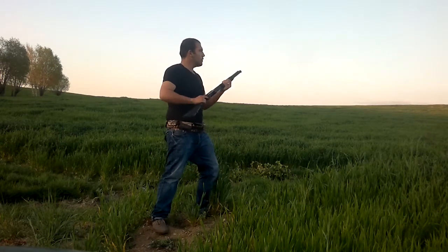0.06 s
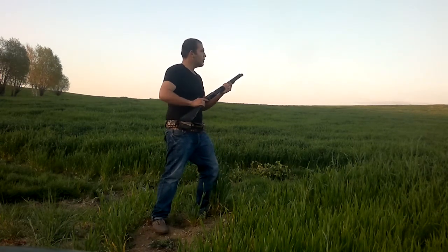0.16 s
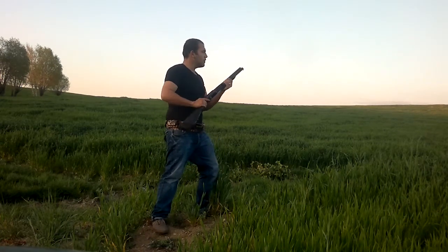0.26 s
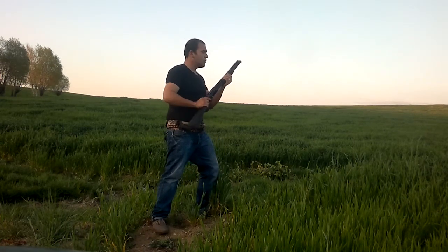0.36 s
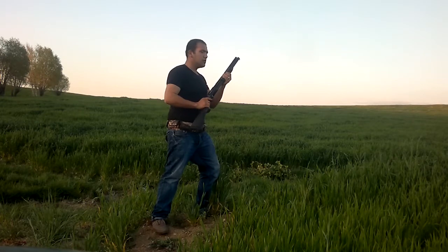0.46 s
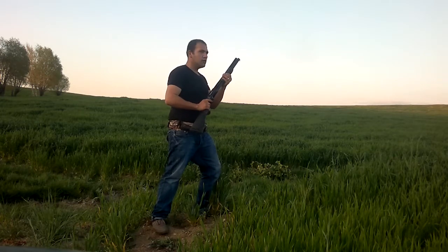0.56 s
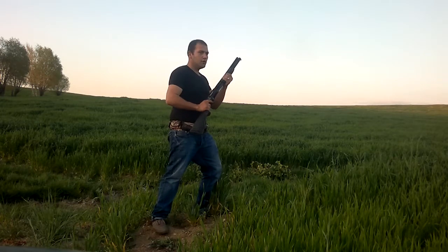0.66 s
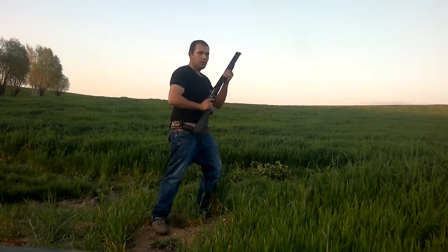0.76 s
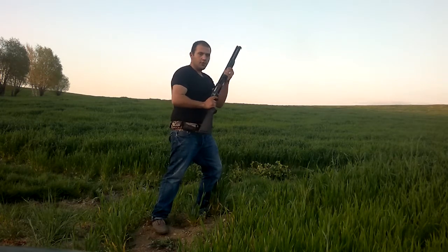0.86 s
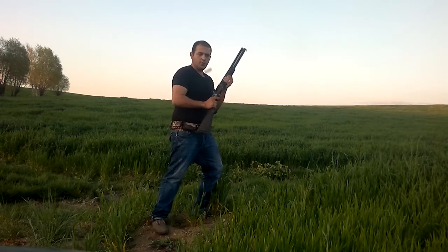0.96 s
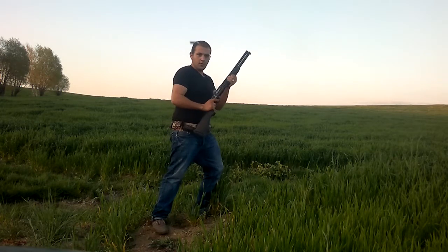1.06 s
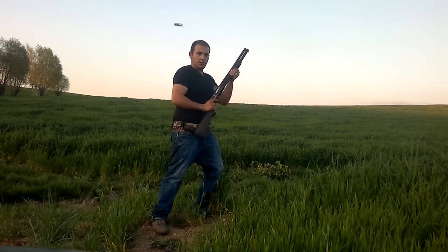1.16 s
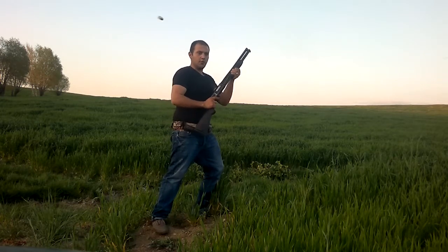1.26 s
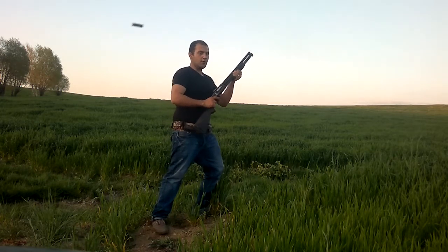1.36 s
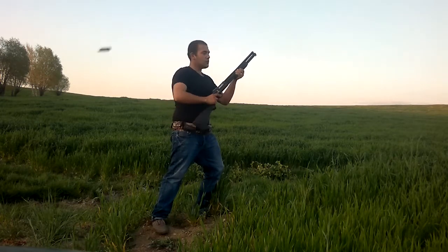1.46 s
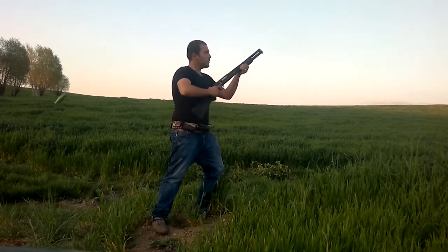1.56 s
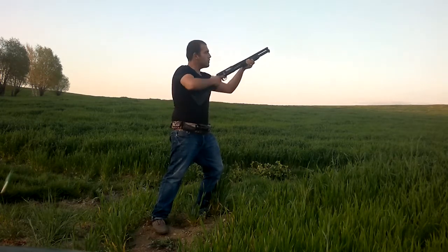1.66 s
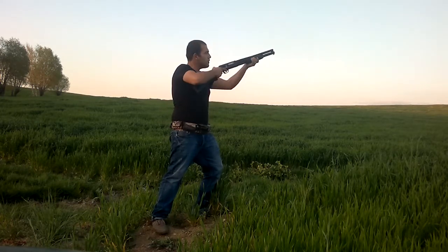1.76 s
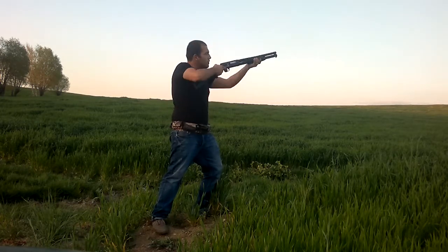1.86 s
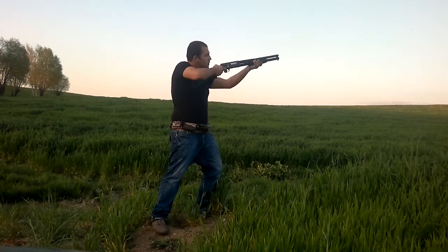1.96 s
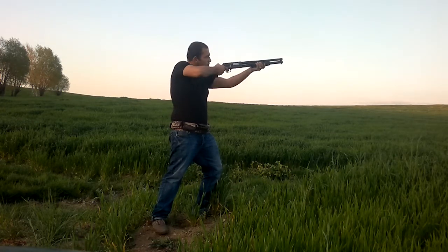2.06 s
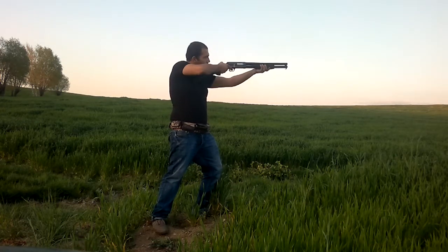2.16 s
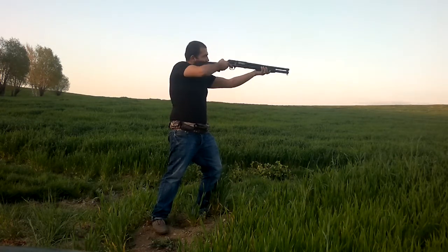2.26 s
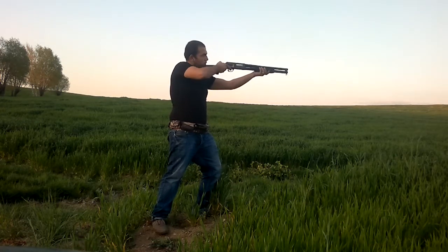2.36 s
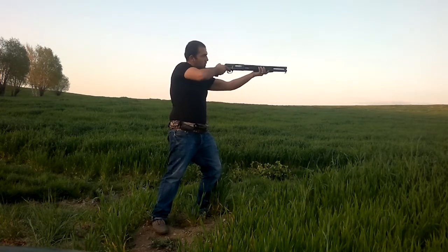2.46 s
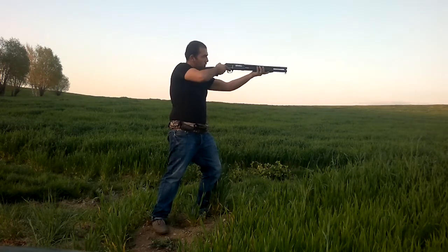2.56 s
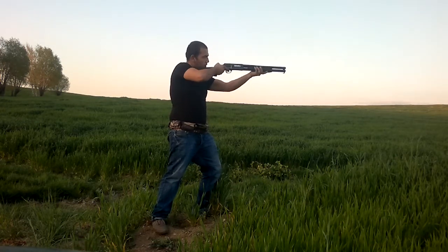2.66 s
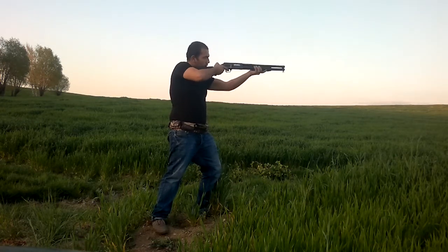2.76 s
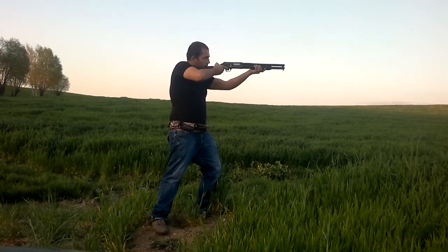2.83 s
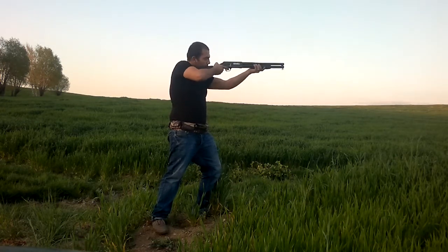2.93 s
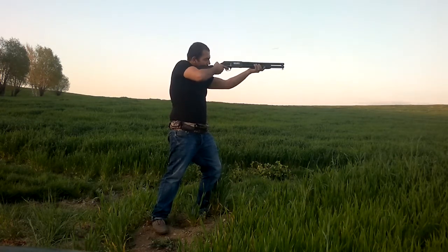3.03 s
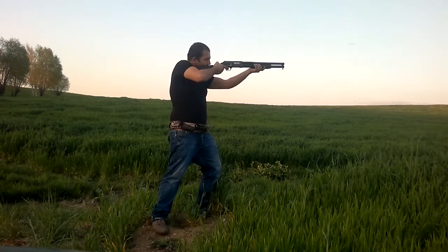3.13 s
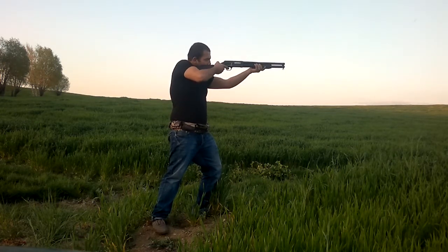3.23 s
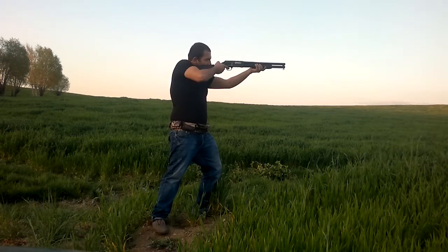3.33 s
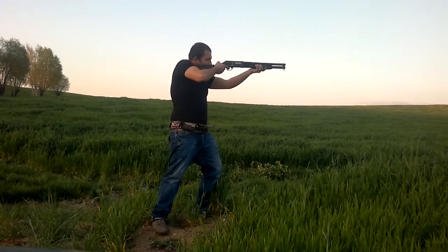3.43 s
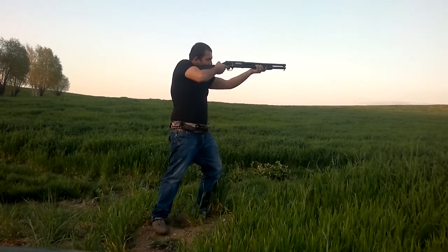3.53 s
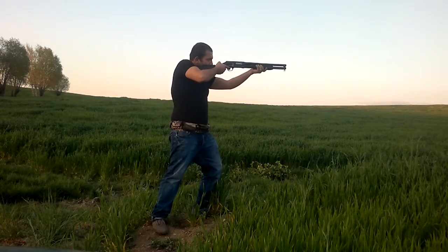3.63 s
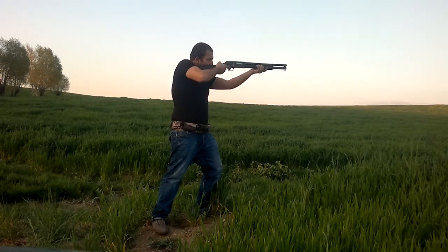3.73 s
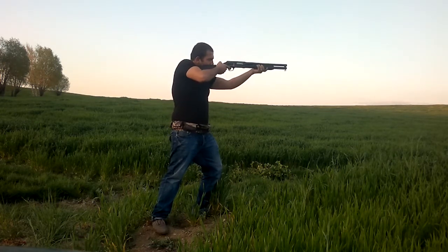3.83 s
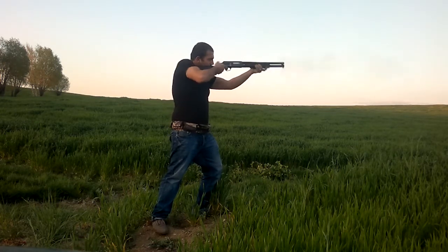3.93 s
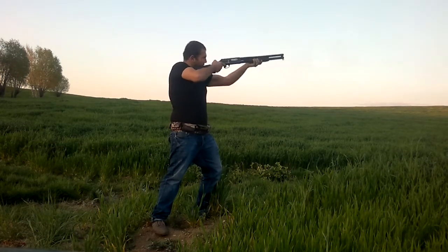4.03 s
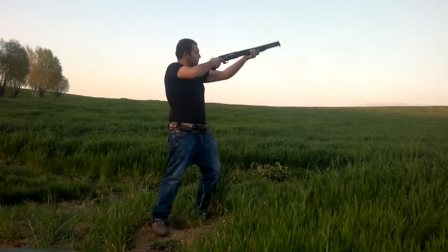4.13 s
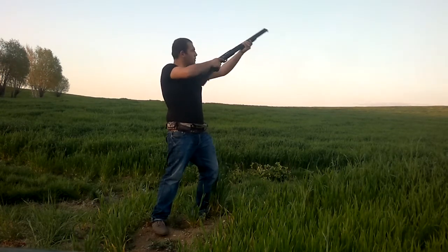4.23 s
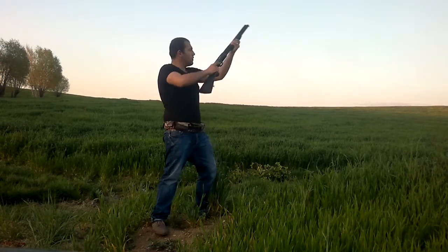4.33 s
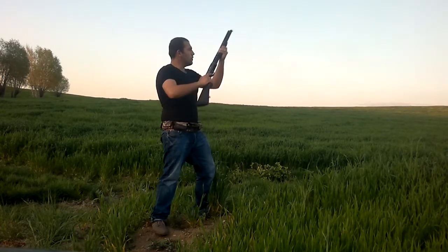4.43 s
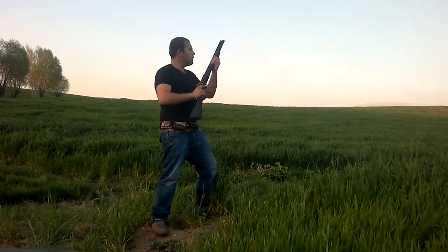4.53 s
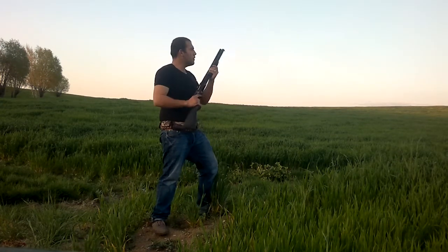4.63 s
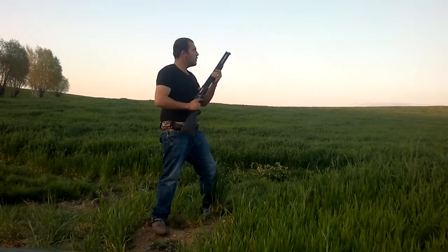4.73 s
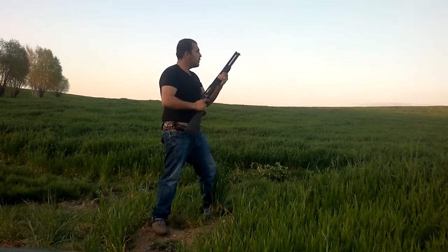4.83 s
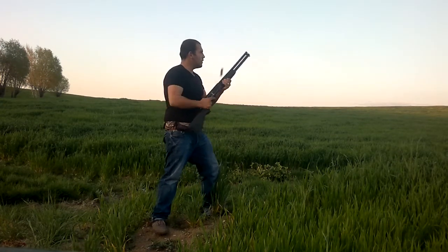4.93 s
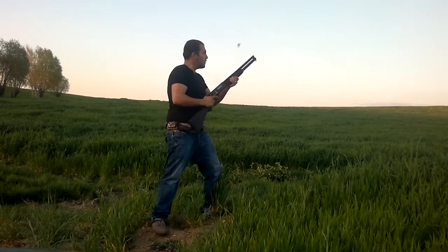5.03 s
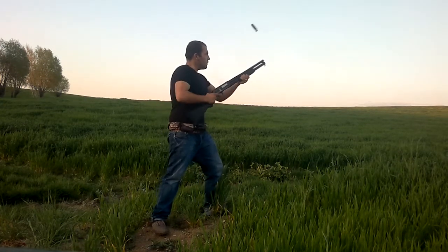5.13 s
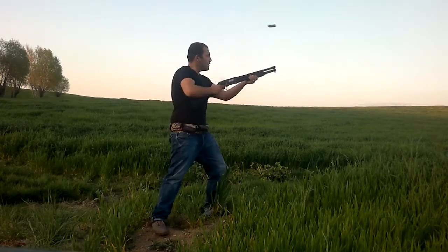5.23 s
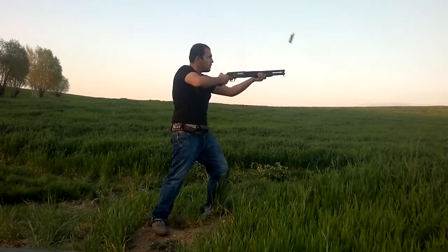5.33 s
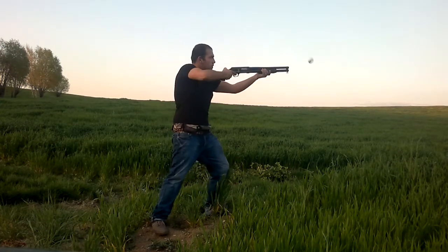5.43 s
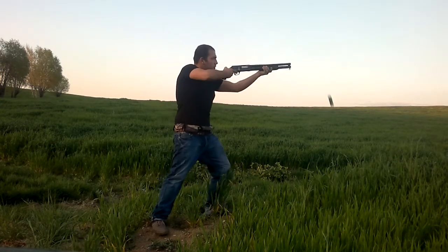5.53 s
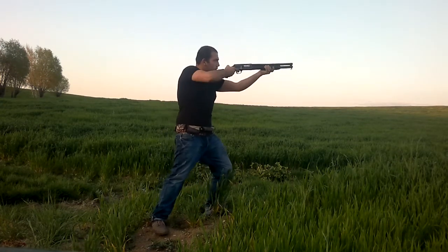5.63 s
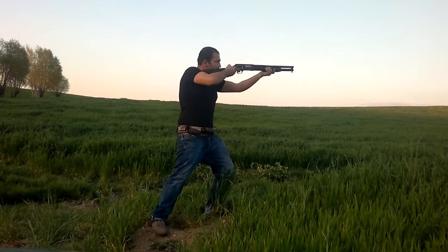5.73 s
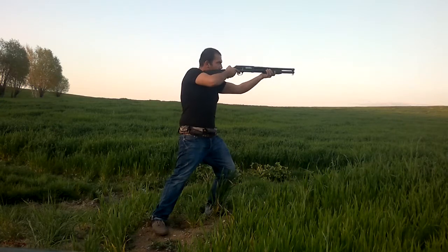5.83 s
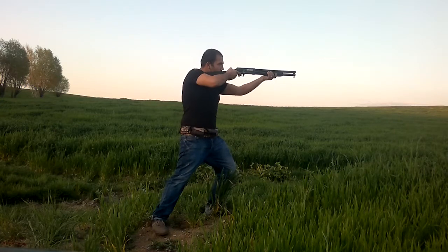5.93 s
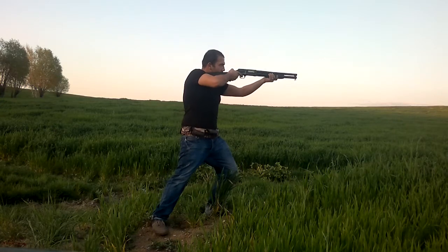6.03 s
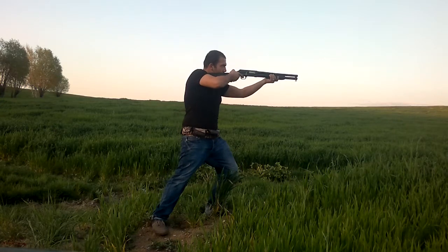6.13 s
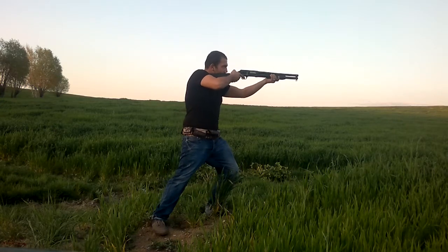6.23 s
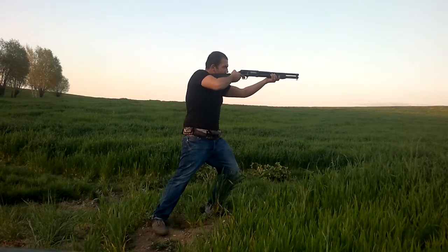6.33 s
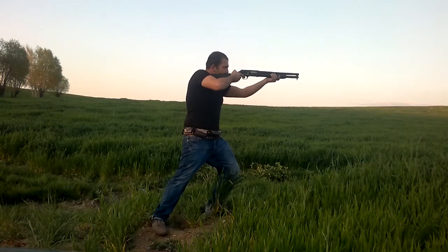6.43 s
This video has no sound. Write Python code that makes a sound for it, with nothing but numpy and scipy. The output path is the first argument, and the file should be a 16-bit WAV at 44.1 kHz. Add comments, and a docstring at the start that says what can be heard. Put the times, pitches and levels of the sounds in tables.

```python
"""A pump-action shotgun fires one shot in an open field, racked before and after, a few metres from a phone.
The blast is a slowing run of overloaded swings, a noise crack and a deep heave; filtered noise makes the
scatter from the grass, slaps from the ground, slope and trees, and the roll; a sinking rumble adds bass.
Bursts of noise through steel modes make the racking; ringing hulls land and dull handling knocks follow.
Behind it, wind rumbles over a far rush that the phone's gain turns down for a while, and an early hiss."""
import sys
import numpy as np
from scipy import signal
from scipy.fft import rfft, irfft
from scipy.io import wavfile
from scipy.ndimage import uniform_filter1d, minimum_filter1d

SR = 44100
rng = np.random.default_rng(int(sys.argv[2]) if len(sys.argv) > 2 else 0)


def unload_wav(signal):
    """Save mono or channel-first audio to the path in sys.argv[1] as 16-bit WAV at rate SR, clipped to [-1, 1]."""
    wavfile.write(
        sys.argv[1],
        SR,
        np.round(np.clip(np.atleast_2d(signal).T, -1, 1) * 32767).astype(np.int16),
    )


N = 286209  # samples

SHOT_S = 3.9318
# spectrum of the blast's noise crack: freq_hz, relative_level_db
CRACK_SPECTRUM = [(50, -6), (100, -1), (200, -3.5), (450, 0), (700, -6), (1000, -1), (1600, -2.5),
                  (2600, -1), (3300, -6.5), (4200, -13.5), (5200, -19), (8000, -19.5), (12000, -20.5),
                  (15500, -37.5)]
# swings of the blast: first rate, time constant of slowing, level, hold, then release
SWING_HZ, SWING_SLOWING_S, SWING_DB, SWING_HOLD_S, SWING_RELEASE_T60_S = 1896, .023, -2.3, .043, .02
# the overloaded microphone stalls midway: time after the shot, half length, share of the swing rate left
STALL_S, STALL_HALF_S, STALL_RATE = .0248, .0052, .24
# the last heave slows too
HEAVE_START_HZ, HEAVE_END_HZ, HEAVE_SLOWING_S = 70, 24, .009

# spectrum of the hiss scattered by the grass: freq_hz, relative_level_db
SCATTER_SPECTRUM = [(40, -10), (100, -3.5), (220, -3.5), (400, -9.5), (650, -14), (950, -3.5), (1200, -5.5),
                    (1600, -16.5), (2350, -9.5), (3300, -16.5), (5000, -25), (8000, -17), (11000, -19),
                    (13200, -28), (15500, -47.5)]
# slaps from the ground, the slope and trees: start_s, level_db, length_s (fall to 1/e)
ECHO_SLAPS = [(3.988, -25, .025), (4.173, -44, 0.018), (4.184, -30.5, 0.006), (4.214, -35.5, 0.019),
              (4.233, -34, 0.015), (4.291, -41.5, .015), (4.35, -41, 0.0088), (4.544, -33.5, 0.011)]
# spectrum of each slap: freq_hz, relative_level_db
ECHO_SPECTRUM = [(200, -21), (600, -9.5), (1000, 11.5), (1600, -1), (2500, -8), (3800, -22), (8000, -50)]

# spectrum of the roll off the trees: freq_hz, relative_level_db
ROLL_SPECTRUM = [(35, -55), (60, -21), (130, -4), (225, -18), (255, -38), (413, -16.5), (628, -2.5),
                 (758, -6), (1020, 3), (1280, -12), (1950, -12.5), (2400, -6.5), (3890, -18.5), (4900, -25),
                 (9000, -33), (11700, -62), (19800, -120)]
# the roll swells as the shot reaches the trees, fades along them and dies quickly past the last
ROLL_DELAY_S, ROLL_ATTACK_S, ROLL_HOLD_S = .25, .07, .72
ROLL_LEVEL_DB, ROLL_SPREADING, ROLL_RELEASE_T60_S = -41.8, 1.03, .95  # spreading is a power of time

# rackings of the slide: rear_stop_s, throw_s (shell out), lock_s (forward), stop_level_db,
# slide_level_db (rubbing and rattle), lock_tilt_db_per_octave (extra treble)
RACKINGS = [(.914, 0.9589, 1.1099, -3.3, -2, 1.5), (4.877, 4.915, 5.082, -9.3, -12, -.7)]
# steel contacts as the slide hits the rear stop: offset_s, relative_level_db, tilt_db_per_octave
REAR_STOP_CONTACTS = [(-.02, -22, -1), (-.0115, -21, -1), (-.0056, -8, 0), (-.0026, -4, 0.5), (0, 0, 0),
                      (.0036, -8.5, -2), (.012, -24, -4)]
# steel contacts as the shell is thrown: offset_s, relative_level_db, tilt_db_per_octave
EJECT_CONTACTS = [(0, -14.5, 2), (.007, -21.5, -0.5), (.028, -26, 7.5)]
# steel contacts as the action locks forward: offset_s, relative_level_db, tilt_db_per_octave
LOCK_CONTACTS = [(-.0125, -19, 2), (-.0095, -14.5, 2), (-.0036, -8.5, .5), (0, -5.2, .5), (.004, -18, -2)]
# the hand takes up the slack, pulls, and turns round once the shell is out
SLACK_S, PULL_S, TURN_S = .057, .026, .018  # before the stop, before the stop, after the throw
SLACK_DB, SLACK_TILT_DB, PULL_DB, PUSH_DB = -42, -8, -37.5, -45.5  # relative; tilt per octave
# the fresh shell rattles on the lifter during the forward stroke: relative level, tilt per octave, scatter
RATTLE_DB, RATTLE_TILT_DB, RATTLE_SCATTER_DB, RATTLE_TILT_SCATTER_DB = -28, 1.5, 1, 3.5
RATTLE_FROM, RATTLE_TO = .355, .615  # shares of the time from throw to lock
# broad clack of the steel: freq_hz, relative_level_db
STEEL_SPECTRUM = [(88, -55), (150, -27), (681, -11.5), (930, -5), (1540, -3.5), (1870, 0.5), (2180, -16),
                  (2980, -9), (4140, -11.5), (5230, -19.5), (6110, -13.5), (8660, -14), (9730, -16),
                  (11400, -8), (15500, -37)]
# ring of receiver and barrel: freq_hz, relative_level_db, t60_s
GUN_RING_MODES = [(958, -3, 0.029), (1210, -3.5, .03), (1396, -3.5, .03), (1722, -3, .022),
                  (1899, -1.5, 0.031), (2410, -8, 0.024), (2980, -7, .025), (3780, -11, .025),
                  (4142, -6, 0.026), (6240, -14, .02), (7020, -8.5, 0.02427), (8580, -8, .02),
                  (10500, -9, 0.02), (10950, -4, .025), (11600, -6.5, .03), (11870, -7.5, 0.0209)]

# the spent shell lands and bounces: start_s, level_db
SHELL_LANDINGS = [(1.807, -25), (1.8204, -35.5), (1.872, -50.5), (1.945, -51), (5.806, -31), (5.823, -42.5)]
# the empty hull rings as a quarter-wave pipe: freq_hz, relative_level_db, t60_s
HULL_RING_MODES = [(950, -16, .027), (1246, 3, 0.054), (1454, -3, 0.018), (2470, -15, 0.018),
                   (3670, -23, 0.039)]
# spectrum of the hull's tick on the ground: freq_hz, relative_level_db
TICK_SPECTRUM = [(150, -16), (400, -13), (1100, 3.5), (2200, -9), (4000, -24), (12000, -23.5), (15000, -38)]

# dull knocks of hands, trigger and boots: start_s, level_db, pitch_hz, t60_s
HANDLING_KNOCKS = [(.143, -34.5, 637, 0.074), (.216, -36.5, 633, 0.046), (2.126, -36, 1006, 0.02),
                   (3.327, -40, 940, 0.058), (3.846, -37.5, 943, 0.05), (3.92, -30, 980, 0.034),
                   (5.184, -44, 1107, 0.029), (5.222, -37.5, 533, 0.059), (6.255, -42.5, 925, .04),
                   (6.313, -39, 707, 0.047), (6.32, -39, 231, 0.082)]
# spectrum of the thud in each knock: freq_hz, relative_level_db
THUD_SPECTRUM = [(150, -10), (600, -0.5), (1200, 1.5), (2400, -13), (3200, -30), (8000, -45.5)]

# gusts on the microphone, over a light breeze: peak_s, level_db, half_length_s (fall to 1/e)
WIND_GUSTS = [(.65, -57.5, .25), (1.42, -43.5, .47), (2.68, -43, .6), (3.75, -60, .2), (6.42, -58, 0.18)]
BREEZE_DB = -63
# spectrum of the wind rumble: freq_hz, relative_level_db
WIND_SPECTRUM = [(12, -46), (20, -16), (73, -2), (91, 2.5), (110, -3), (150, -12), (216, -21), (307, -18.5),
                 (400, -26.5), (520, -54.5), (880, -120)]
# spectrum of the distant rush: freq_hz, relative_level_db
RUSH_SPECTRUM = [(120, -37.5), (200, -6), (304, -5), (352, -10), (462, -5), (842, -2), (1090, -2.5),
                 (1230, -4), (1650, -10.5), (2560, -16.5), (3070, -38), (3750, -34.5), (4330, -39),
                 (9660, -41), (15500, -49)]
# the phone's gain turns the rush down for a while: start_s, end_s, depth_db
RUSH_DUCKS = [(0.285, 1.33, -7), (3.95, 5.727, -8)]
RUSH_LEVEL_DB, DUCK_EDGE_S = -51.5, .13
# spectrum of the faint early hiss: freq_hz, relative_level_db
HISS_SPECTRUM = [(300, -40), (700, -10), (1500, -6), (2400, 0.5), (3000, -5), (3700, -17.5), (4500, -23),
                 (5500, -52), (12000, -65.5)]
TOP_HZ = 15750  # upper edge of the phone's sound


def blast(crack_db=-6.5, crack_t60=.095, heave_db=-3.0):
    """The blast throws the microphone into full, ragged swings that slow; a deep heave lets it settle."""
    scatter, heave_s, heave_length_s, ceiling = .36, .045, .028, .92
    t = clock(.4)
    stall = STALL_RATE ** np.exp(-((t - STALL_S) / STALL_HALF_S) ** 4)
    swing_hz = SWING_HZ * np.exp(-t / SWING_SLOWING_S) * stall * np.exp(scatter * walk(t, 1500))
    swing_level = undb(SWING_DB) * fade(np.maximum(t - SWING_HOLD_S, 0), SWING_RELEASE_T60_S)
    swings = -np.sin(2 * np.pi * np.cumsum(swing_hz) / SR) * swing_level
    crack = noise(t, CRACK_SPECTRUM) * undb(crack_db) * fade(t, crack_t60)
    late = np.maximum(t - heave_s, 0)
    heave_hz = HEAVE_END_HZ + (HEAVE_START_HZ - HEAVE_END_HZ) * np.exp(-late / HEAVE_SLOWING_S)
    heave_wave = -np.sin(2 * np.pi * np.cumsum(heave_hz * (late > 0)) / SR)
    heave = heave_wave * np.exp(-(late / heave_length_s) ** 2) * undb(heave_db)
    pressure = swings + crack + heave
    # a fast limiter holds the swings near full scale
    gain = minimum_filter1d(ceiling / np.maximum(np.abs(pressure), ceiling), size=41)
    return pressure * uniform_filter1d(gain, size=41)


def field(near_db=-21, hold_s=0.074, near_t60=0.26, far_db=-29.5, far_t60=.92):
    """The shot comes back: a hiss scattered by the grass and slaps from the ground, the slope and trees."""
    out, t = np.zeros(N), clock(1.2)
    near = undb(near_db) * fade(np.maximum(t - hold_s, 0), near_t60)
    far = undb(far_db) * fade(t, far_t60)
    hiss = waver(noise(t, SCATTER_SPECTRUM), 60, 3.5)
    add(out, SHOT_S, hiss * (near + far))
    t = clock(0.17)
    for start, db, length in ECHO_SLAPS:
        add(out, start, noise(t, ECHO_SPECTRUM) * undb(db) * np.exp(-(t / length) ** 2))
    return out


def roll(treble_hz=4200, treble_db=16, treble_t60=1.3):
    """A long uneven roll from further and further off; the air takes its treble on the way."""
    t = clock(2)
    sound = waver(noise(t, ROLL_SPECTRUM), 35, 3.5)
    dull = signal.sosfiltfilt(signal.butter(6, treble_hz, fs=SR, output="sos"), sound)
    treble = (sound - dull) * undb(treble_db) * fade(t, treble_t60)
    since = t - ROLL_DELAY_S
    attack = np.clip(since / ROLL_ATTACK_S, 0, 1)
    spreading = np.maximum(t / (ROLL_DELAY_S + ROLL_ATTACK_S), 1) ** -ROLL_SPREADING
    release = fade(np.maximum(since - ROLL_HOLD_S, 0), ROLL_RELEASE_T60_S)
    return (dull + treble) * undb(ROLL_LEVEL_DB) * attack * spreading * release


def boom(boom_db=-30.7, boom_t60=0.93, start_hz=310, end_hz=125, sink_s=0.18, width_hz=110):
    """The bass of the echo: a narrow rumble that sinks in pitch as it recedes."""
    t = clock(1.5)
    hz = end_hz + (start_hz - end_hz) * np.exp(-t / sink_s)
    phase = 2 * np.pi * np.cumsum(hz) / SR
    rumble = walk(t, width_hz) * np.sin(phase) + walk(t, width_hz) * np.cos(phase)
    return rumble * undb(boom_db) * fade(t, boom_t60)


def action(clack_db=-2, contact_t60=0.017, tick_db=8, grass_db=-17, grass_t60=.21, grass_tilt_db=1.4):
    """Bolt, lifter and shell chatter at each contact; the slide rubs between; grass scatters it briefly."""
    out = np.zeros(N)
    for rear, throw, lock, stop_db, slide_db, lock_tilt_db in RACKINGS:
        t = clock(.1)
        for start, db, tilt_db in contacts(rear, throw, lock, stop_db, slide_db, lock_tilt_db):
            chatter = rng.standard_normal(len(t)) * fade(t, contact_t60)
            chatter[0] += undb(tick_db)
            add(out, start, undb(clack_db + db) * gun_body(chatter, tilt_db))
        t = clock(0.41)
        for start, end, db, tilt_db in strokes(rear, throw, lock):
            grit = unit(rng.standard_normal(len(t)) * undb(4 * walk(t, 600)))
            rubbing = grit * (t < end - start)
            add(out, start, undb(slide_db + db) * gun_body(rubbing, tilt_db))
    # countless blades return the energy as a diffuse wash with no ring left in it
    t = clock(0.41)
    decay = fade(t, grass_t60) ** 2
    energy = np.abs(signal.fftconvolve(out ** 2, decay / decay.sum())[:N])
    wash = np.sqrt(energy) * colour(rng.standard_normal(N), STEEL_SPECTRUM, grass_tilt_db)
    return out + undb(grass_db) * wash


def contacts(rear, throw, lock, stop_db, slide_db, lock_tilt_db):
    """Contacts of one racking as (start s, dB, tilt): stop, throw, lock and the fresh shell's loose rattle."""
    moments = [(rear, REAR_STOP_CONTACTS, 0), (throw, EJECT_CONTACTS, 0), (lock, LOCK_CONTACTS, lock_tilt_db)]
    rows = []
    for moment, pattern, extra_db in moments:
        for offset, db, tilt_db in pattern:
            rows.append((moment + offset, stop_db + db, tilt_db + extra_db))
    chance = rng.standard_normal(size=(3, 3))
    shares = np.linspace(RATTLE_FROM, RATTLE_TO, len(chance))
    for share, (early, strong, bright) in zip(shares, chance):
        start = throw + share * (lock - throw) - 0.0034 * early
        db = slide_db + RATTLE_DB + RATTLE_SCATTER_DB * strong
        rows.append((start, db, RATTLE_TILT_DB + RATTLE_TILT_SCATTER_DB * bright))
    return rows


def strokes(rear, throw, lock):
    """The rubbing of one racking as (start s, end s, dB, tilt): dull slack, hard pull, lighter push."""
    pull, turn = rear - PULL_S, throw + TURN_S
    return [(rear - SLACK_S, pull, SLACK_DB, SLACK_TILT_DB), (pull, turn, PULL_DB, 0), (turn, lock, PUSH_DB, 0)]


def gun_body(force, tilt_db=0, ring_db=-2, spread_db=1.0, lowest_hz=260):
    """A force sounds as a broad clack and the ring of the steel; the slim body radiates no bass."""
    modes = ring(clock(.08), GUN_RING_MODES, spread_db, tilt_db)
    rung = signal.fftconvolve(force, modes / np.linalg.norm(modes))[:len(force)]
    sound = colour(force, STEEL_SPECTRUM, tilt_db) + undb(ring_db) * rung
    return signal.sosfilt(signal.butter(3, lowest_hz, "high", fs=SR, output="sos"), sound)


def ring(t, modes, spread_db=0, tilt_db=0):
    """Damped modes; each contact wakes them in its own proportions, with its own treble tilt."""
    hz, db, t60 = np.transpose(modes)[:, :, None]
    shares = undb(db + tilt_db * np.log2(hz / hz[0]) + spread_db * rng.standard_normal(hz.shape))
    signs = rng.choice([-1, 1], hz.shape)
    return np.sum(shares * signs * np.sin(2 * np.pi * hz * t) * fade(t, t60), axis=0)


def shells(tick_db=-13, tick_t60=0.015):
    """Almost a second after each ejection the hollow hull hits the ground with a pop."""
    out, t = np.zeros(N), clock(0.092)
    for start, db in SHELL_LANDINGS:
        tick = undb(tick_db) * noise(t, TICK_SPECTRUM) * fade(t, tick_t60)
        add(out, start, undb(db) * (ring(t, HULL_RING_MODES) + tick))
    return out


def knocks(thud_db=-7, thud_t60=0.063):
    """Soft contacts: one damped resonance and a dull thud."""
    out, t = np.zeros(N), clock(.15)
    push = np.minimum(t / .002, 1)  # soft onset
    for start, db, hz, t60 in HANDLING_KNOCKS:
        thud = undb(thud_db) * noise(t, THUD_SPECTRUM) * fade(t, thud_t60)
        resonance = np.sin(2 * np.pi * hz * t) * fade(t, t60)
        add(out, start, undb(db) * push * (resonance + thud))
    return out


def air(swell_db=1, buffet_db=3, hiss_db=-58, hiss_t60=1.4):
    """A distant rush that wavers, gusts buffeting the microphone, and a faint hiss that dies away early."""
    t = np.arange(N) / SR
    rush = waver(noise(t, RUSH_SPECTRUM), 20, 3)
    duck_db = 0
    for start, end, db in RUSH_DUCKS:
        duck_db = duck_db + db * (np.tanh((t - start) / DUCK_EDGE_S) - np.tanh((t - end) / DUCK_EDGE_S)) / 2
    rush = rush * undb(RUSH_LEVEL_DB + duck_db + swell_db * walk(t, 7.3))
    flow = undb(BREEZE_DB)
    for peak, db, length in WIND_GUSTS:
        flow = flow + undb(db) * np.exp(-((t - peak) / length) ** 2)
    wind = noise(t, WIND_SPECTRUM) * flow * undb(buffet_db * walk(t, 18))
    hiss = noise(t, HISS_SPECTRUM) * undb(hiss_db) * fade(t, hiss_t60)
    return rush + wind + hiss


def waver(x, rate, depth_db):
    """Moving air lets each half-octave band swell and sink on its own."""
    t, out = np.arange(len(x)) / SR, 0
    for edge_hz in 200 * 2 ** (np.arange(9) / 2):
        band = signal.sosfiltfilt(signal.butter(6, edge_hz, fs=SR, output="sos"), x)
        x = x - band  # what is left lies above the edge
        out = out + band * undb(depth_db * walk(t, rate))
    return unit(out + x)


def colour(x, points, tilt_db=0):
    """Causal filter with a (Hz, dB) spectrum, tilted per octave; white noise keeps its level."""
    size = 4096
    octave = np.log2(np.maximum(np.arange(size // 2 + 1), 1) * SR / size)
    hz, db = np.transpose(points)
    # folding the cepstrum forward gives minimum phase
    cepstrum = irfft(np.log(undb(np.interp(octave, np.log2(hz), db) + tilt_db * octave)))
    cepstrum[1:size // 2] *= 2
    cepstrum[size // 2 + 1:] = 0
    response = irfft(np.exp(rfft(cepstrum)))
    return signal.fftconvolve(x, response / np.linalg.norm(response))[:len(x)]


def noise(t, points):
    """Coloured noise of rms 1."""
    return unit(colour(rng.standard_normal(len(t)), points))


def walk(t, rate):
    """Random wander with a spread near 1, through rate new points a second."""
    return np.interp(t * rate, np.arange(len(t)), rng.standard_normal(len(t)))


def fade(t, t60):
    """Exponential decay, 60 dB in t60 seconds."""
    return undb(-60 * t / t60)


def undb(db):
    """Decibels to gain."""
    return 10 ** (np.asarray(db) / 20)


def unit(x):
    """Scale to rms 1."""
    return x / np.std(x)


def clock(seconds):
    """Sample times from zero."""
    return np.arange(int(seconds * SR)) / SR


def add(track, start, x):
    """Mix a sound in at a time in seconds."""
    i = int(start * SR)
    track[i:i + len(x)] += x[:N - i]


def scene():
    """Gun, field and air in one channel."""
    out = action() + shells() + knocks() + field() + air()
    for part in (blast(), boom(), roll()):
        add(out, SHOT_S, part)
    return out[None]


def record(dry):
    """The phone clips at full scale and cuts the top."""
    top_cut = signal.ellip(12, .1, 80, TOP_HZ, fs=SR, output="sos")
    return signal.sosfilt(top_cut, np.clip(dry, -1, 1))


dry = scene()
out = record(dry)
unload_wav(out)
```